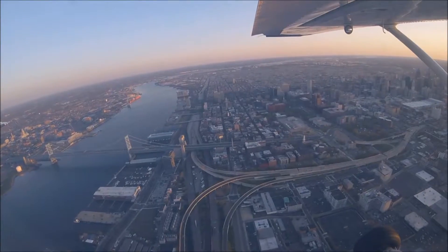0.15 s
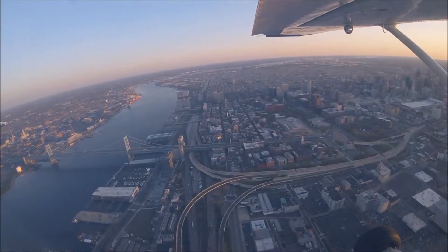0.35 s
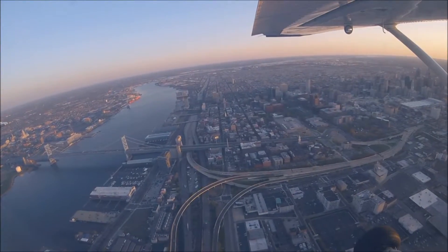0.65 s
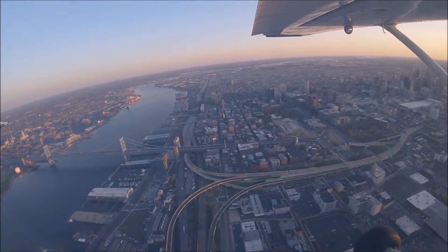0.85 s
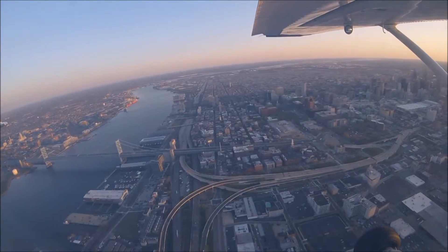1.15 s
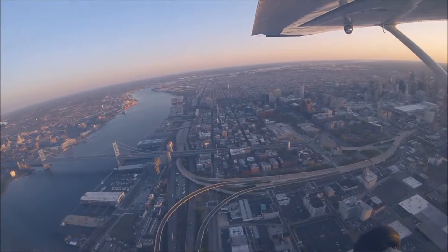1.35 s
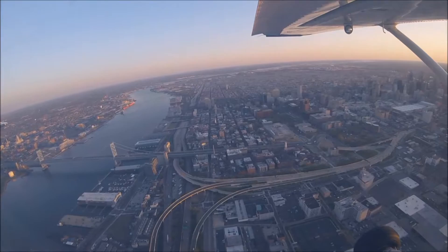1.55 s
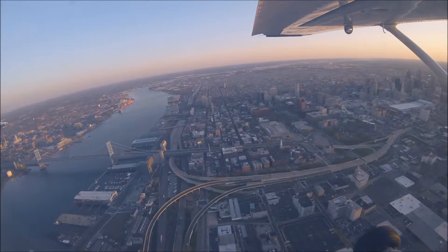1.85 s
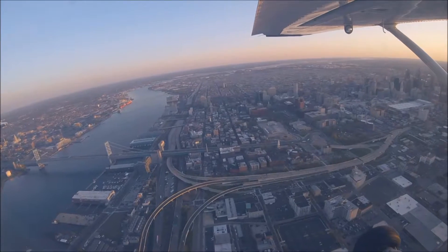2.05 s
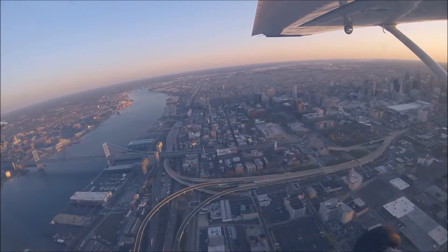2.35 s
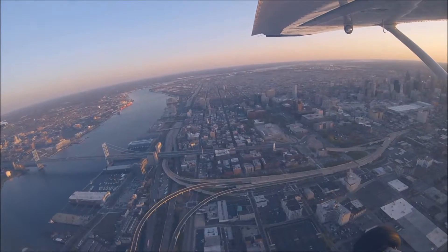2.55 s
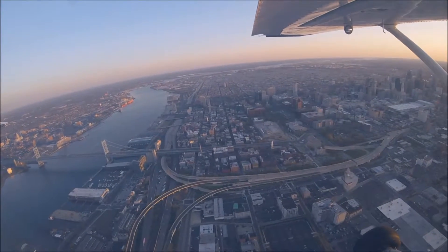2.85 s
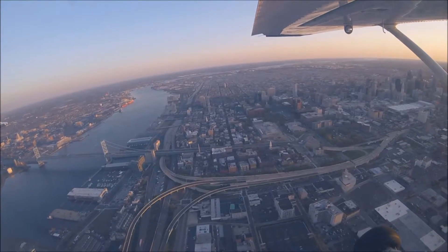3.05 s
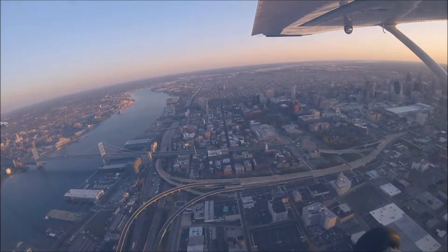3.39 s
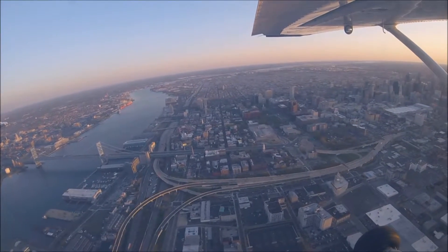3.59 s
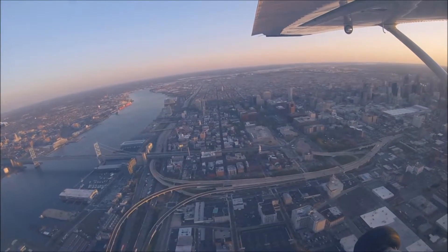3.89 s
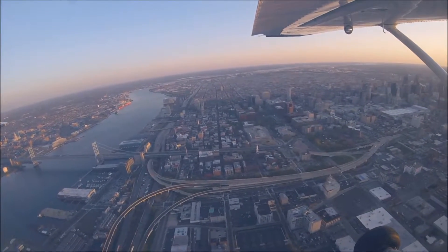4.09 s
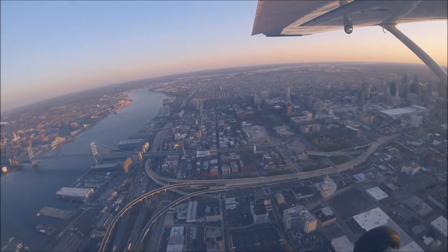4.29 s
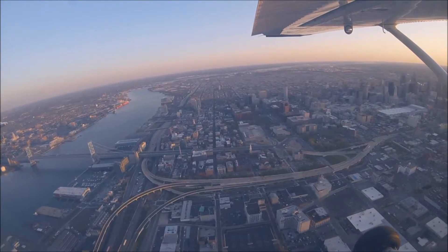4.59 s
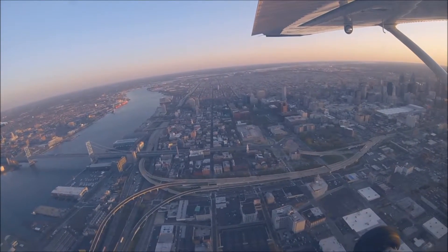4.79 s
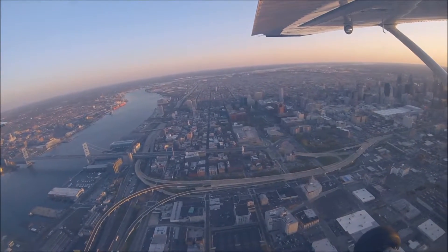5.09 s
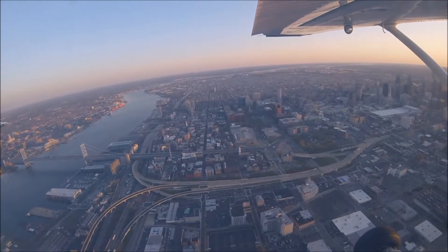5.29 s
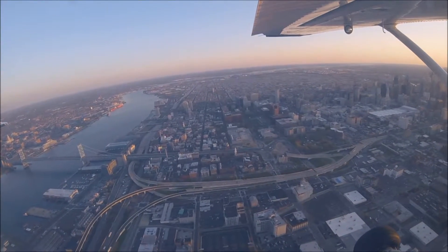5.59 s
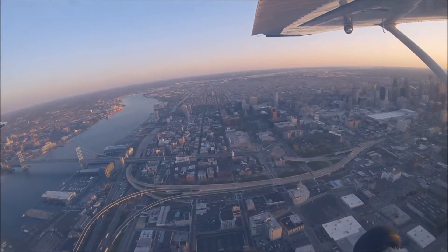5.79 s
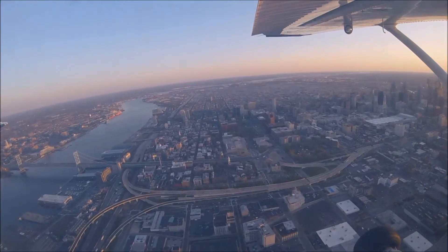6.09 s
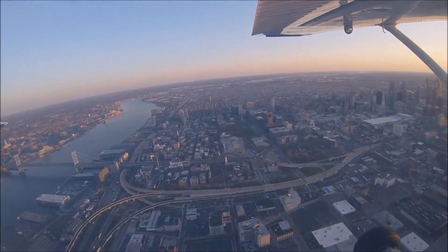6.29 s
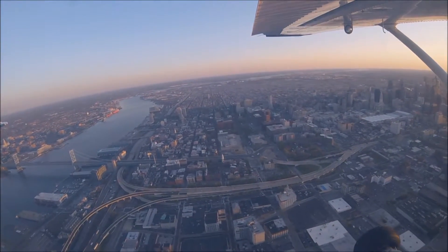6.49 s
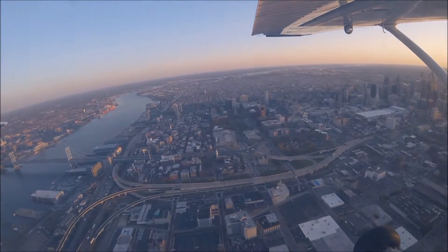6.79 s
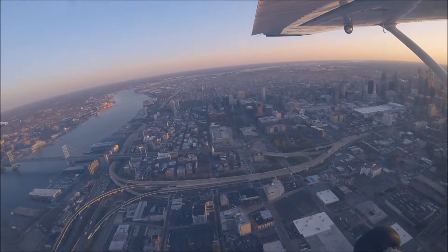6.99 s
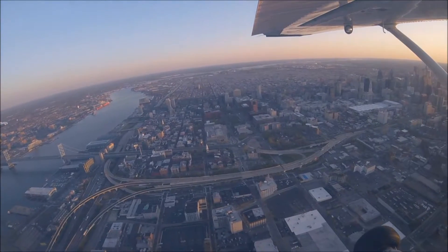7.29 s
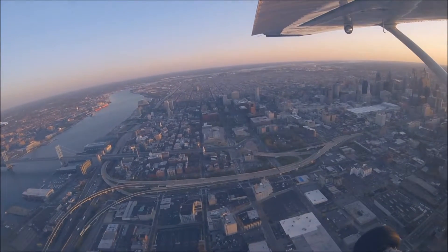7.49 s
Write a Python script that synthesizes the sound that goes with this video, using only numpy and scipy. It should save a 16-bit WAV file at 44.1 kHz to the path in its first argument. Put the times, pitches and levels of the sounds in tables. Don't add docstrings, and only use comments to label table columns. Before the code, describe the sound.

A light propeller plane's steady low engine drone fades up from near silence, with booming cabin panels and soft wind hiss past the windows.

```python
import sys
import numpy as np
from scipy import signal
from scipy.fft import rfft, irfft, next_fast_len
from scipy.io import wavfile
from scipy.ndimage import uniform_filter1d, map_coordinates

SR = 44100
rng = np.random.default_rng(int(sys.argv[2]) if len(sys.argv) > 2 else 0)


def magnitude_from_level(level_db):
    exponent = np.asarray(level_db, float) / 20
    return 10 ** exponent


def dump_mix(stems):
    frames = np.atleast_2d(stems).T
    limited = np.clip(frames, -1, 1)
    pcm = np.round(limited * 32767).astype(np.int16)
    wavfile.write(sys.argv[1], SR, pcm)


N = 337365

# (time [s], speed [rpm])
SHAFT_SPEED = [
    (0, 2272),
    (1.5, 2272),
    (2.8, 2280),
    (3.6, 2274),
    (4.3, 2290),
    (5.05, 2268),
    (5.7, 2283),
    (6.8, 2273),
    (7.65, 2274),
]
# (multiple of the two-turn engine cycle [1], level [dB])
ENGINE_ORDERS = [(2, -5.5), (3, -12.5), (4, -2), (6, 14), (7, -12.5), (8, 1.2), (9, 3.5), (10, -10),
                 (12, -11.5), (14, -11.5), (15, -8), (16, -10), (18, -12.5), (20, -7), (21, -26.5),
                 (24, -8.5), (25, -21), (26, -24), (27, -22), (28, -22), (29, -23.5), (31, -21.5),
                 (32, -20.5), (33, -34), (35, -29), (36, -23.5), (39, -22), (40, -36.5), (42, -27),
                 (44, -34.5)]
# (multiple of the cycle [1], middle [s], length [s], lift [dB])
TONE_SWELLS = [(4, 2.15, 1.4, 13), (4, 3.6, 1.2, 5.5), (4, 7.6, 1, 15.5), (12, 5.7, 2.7, 11.5),
               (12, .7, .8, 6), (14, 2.1, 3.3, 8), (16, 2.9, 5.2, 11), (16, 8.2, 1.1, 12.5),
               (20, 1.1, 1.4, 5), (20, 2.6, 0.86, 2), (24, 2.3, 1.4, 5.5)]
# (frequency [Hz], density [dB per Hz])
PANEL_BOOM = [(10, -26.5), (28, -20.5), (38, -11.5), (49, 0), (70, -0.5), (130, -2), (200, -4.5), (300, -9),
              (400, -14), (600, -27.5), (900, -30), (1500, -69.5), (3000, -140)]
# (frequency [Hz], density [dB per Hz])
WINDOW_HISS = [(290, -24.5), (500, -1), (594, -1.5), (857, -6.5), (972, -1.5), (1390, -7.5), (1570, -6.5),
               (2100, -14), (2410, -12), (2760, -16), (3320, -16.5), (3760, -16.5), (6530, -24.5),
               (7750, -32), (10100, -65), (17000, -120)]
# (frequency [Hz], density [dB per Hz])
THIN_TREBLE = [(7000, -24.5), (7800, -7.5), (8300, -6.5), (9200, -4.5), (9400, -12), (10200, -13),
               (10900, -11), (11450, -9), (11750, -17), (12400, -26.5), (12900, -18.5), (13500, -22),
               (14000, -44.5), (14500, -64.5)]
# (frequency [Hz], width [Hz], lift before the turn [dB], lift after [dB])
WINDOW_MODES = [(968, 43, 3.5, 3.5), (1073, 110, 2, 1.5), (2250, 290, 1, 2.5), (2590, 99, -3.5, 2),
                (2950, 150, 5, 0.5), (3020, 140, 0.5, 4.5), (3280, 72, 1.5, 6), (3327, 200, 3.5, 3.5),
                (3480, 55, 4, -2), (3700, 41, 3, 4.5), (3716, 170, -6.5, -4), (6500, 89, 4, 7)]
# (middle [s], length [s], lift [dB])
GUST_EVENTS = [
    (.6, .8, 1),
    (4.353, 0.6, 2),
    (5.4, 0.66, 1.5),
    (6.508, 0.81, 1),
]
# (time [s], shortage 0-1 [1])
COARSE_FRAMES = [(0.209, 0.67), (0.636, 0.47), (0.83, 0.57), (1.236, 0.67), (1.277, 0.82), (1.463, 0.45),
                 (1.591, 0.77), (1.666, 0.74), (1.683, 0.93), (1.811, 0.63), (1.849, 0.96), (2.194, 0.71),
                 (3.062, 0.62), (3.091, 0.54), (3.454, 0.53), (3.643, 0.5), (4.008, 0.77), (4.2, 0.71),
                 (4.264, 0.72), (4.534, 0.59), (5.108, 0.6), (5.195, 0.51), (5.558, 0.47), (6.623, 0.56)]
# (frequency [Hz], level re mean line [dB])
SMALLEST_LINE = [(1200, -34), (2500, -22), (4000, -16), (6800, -15), (7600, 5), (9000, 4), (11000, 0),
                 (12300, 2), (13500, 0)]
FRAME_LEADS = (212, 530)


def engine(cycle):
    phase = cycle[::8]
    tones = np.zeros(len(phase))
    for order, db in ENGINE_ORDERS:
        waver_db = np.clip(0.09 * order, 0, 3) * wobble(3)[::8]
        lifts = [lift_db * swell(middle, length)[::8]
                 for swell_order, middle, length, lift_db in TONE_SWELLS if round(swell_order) == order]
        path_db = -4 + sum(lifts) if lifts else 0
        lag = 0.25 * order * order
        tones += magnitude_from_level(db + waver_db + path_db) * np.sqrt(2) * np.sin(order * phase - lag)
    return signal.resample_poly(tones, 8, 1, window=("kaiser", 14), padtype="reflect")[:N]


def crank():
    time, speed = np.transpose(SHAFT_SPEED)
    rpm = np.interp(np.arange(N) / SR, time, speed) * (1 + 0.0012 * wobble(6))
    cycles_per_second = rpm / (2 * 60)
    return 2 * np.pi * np.cumsum(cycles_per_second) / SR


def boom():
    gust_db = gusts() + 0.41 * wobble(1.9)
    return magnitude_from_level(8.5 + gust_db) * rush(lambda hz: along(PANEL_BOOM, hz), patchy_db=0.27)


def hiss(cycle):
    turn = np.pi / 2 * np.clip((np.arange(N) / SR - 2.5) / 2.4, 0, 1)
    before = np.cos(turn) * rush(lambda hz: window_colour(hz, 0), patchy_db=0.75)
    after = np.sin(turn) * rush(lambda hz: window_colour(hz, 1), patchy_db=0.62)
    body = magnitude_from_level(-3.5) * (before + after)
    thin = magnitude_from_level(-39) * rush(lambda hz: along(THIN_TREBLE, hz) - 60 * (hz < 7000), patchy_db=4.0)
    shake = 1 + 0.025 * np.sin(3 * cycle) + 0.025 * np.sin(6 * cycle)
    gust_db = 0.65 * gusts() + 0.16 * wobble(4.4)
    return magnitude_from_level(gust_db) * shake * (body + thin)


def window_colour(hz, view):
    colour = along(WINDOW_HISS, hz)
    for centre, width, *lift_db in WINDOW_MODES:
        colour = colour + lift_db[view] / (1 + (2 * (hz - centre) / width) ** 2)
    return colour


def gusts():
    return sum(lift_db * swell(middle, length) for middle, length, lift_db in GUST_EVENTS)


def swell(middle, length):
    return np.exp(-np.abs(2 * (np.arange(N) / SR - middle) / length) ** 3)


def rush(gain_db, patchy_db):
    z = signal.stft(rng.standard_normal(N + 4096), SR, nperseg=1024)[2]
    field = uniform_filter1d(rng.standard_normal(z.shape), size=6, axis=0)
    field = uniform_filter1d(field, size=8, axis=1)
    white = signal.istft(z * magnitude_from_level(patchy_db * unit(field)), nperseg=1024)[1]
    m = next_fast_len(len(white))
    coloured = rfft(white, m) * magnitude_from_level(gain_db(np.fft.rfftfreq(m, 1 / SR)))
    return unit(irfft(coloured, m)[:N])


def wobble(rate):
    coarse = np.arange(0, N + 32, 32)
    knots = rng.standard_normal(int(N * rate / SR) + 4)
    return np.interp(np.arange(N), coarse, map_coordinates(knots, [coarse * rate / SR]))


def along(points, hz):
    f, v = np.transpose(points)
    return np.interp(np.log(hz + 1), np.log(f + 1), v)


def unit(x):
    return x / np.sqrt(np.mean(x ** 2) + 1e-20)


def scene():
    cycle = crank()
    return (engine(cycle) + boom() + hiss(cycle))[None]


def camera(x, lead):
    frame, window = 941, "cosine"
    padded = np.pad(x, (lead, frame), "reflect")
    hz, t, z = signal.stft(padded, SR, window, 2 * frame, frame, boundary="even")
    usual = np.sqrt(uniform_filter1d(np.mean(np.abs(z) ** 2, axis=1), size=40))
    shortage = np.zeros(len(t))
    for time, lack in COARSE_FRAMES:
        shortage[round((time * SR + lead) / frame)] = lack
    choice = rng.standard_normal((len(hz) // 10 + 1, len(t)))
    choice = unit(uniform_filter1d(choice, size=2, axis=1))
    band_db = 5.1 * np.repeat(choice, 10, axis=0)[:len(hz)]
    step_db = along(SMALLEST_LINE, hz)[:, None] + band_db + 29 * shortage ** 0.3
    step = usual[:, None] * magnitude_from_level(step_db)
    steps = np.floor(np.abs(z) / step + 0.56)
    snapped = steps * step * np.exp(1j * np.angle(z))
    kept = np.where(hz[:, None] > 1200, snapped, z)
    return signal.istft(kept, SR, window, 2 * frame, frame)[1][lead:lead + N]


def fader():
    pictures, fade_s, bend = 30 / 1.001, 4.55, 1.037
    held = np.floor((np.arange(N) / SR - 0.0112) * pictures) / pictures
    start = magnitude_from_level(-22)
    return magnitude_from_level(-26.5) * (start + (1 - start) * np.clip(held / fade_s, 0, 1) ** bend)


def low_pass(x):
    return signal.sosfilt(signal.butter(12, 15700, fs=SR, output="sos"), x)


def record(dry):
    top, knee = 21, 4
    limited = dry[0] / (1 + np.abs(dry[0] / top) ** knee) ** (1 / knee)
    late = np.clip((np.arange(N) / SR - 4.4) / 0.02, 0, 1)
    heard = (1 - late) * camera(limited, FRAME_LEADS[0]) + late * camera(limited, FRAME_LEADS[1])
    return low_pass((heard * fader())[None])


dry = scene()
out = record(dry)
dump_mix(out)
```